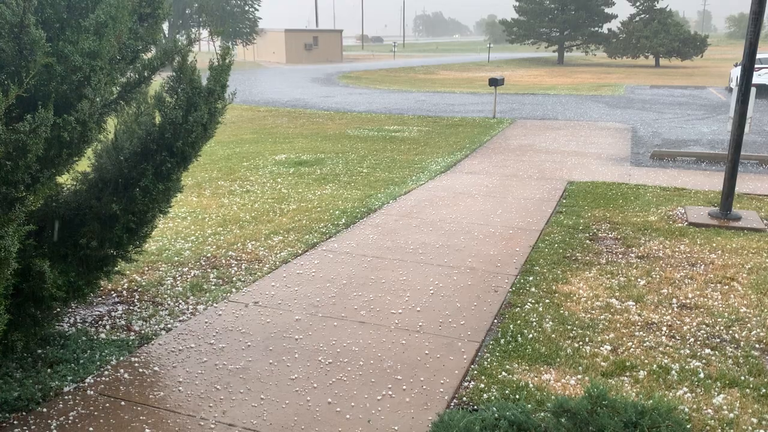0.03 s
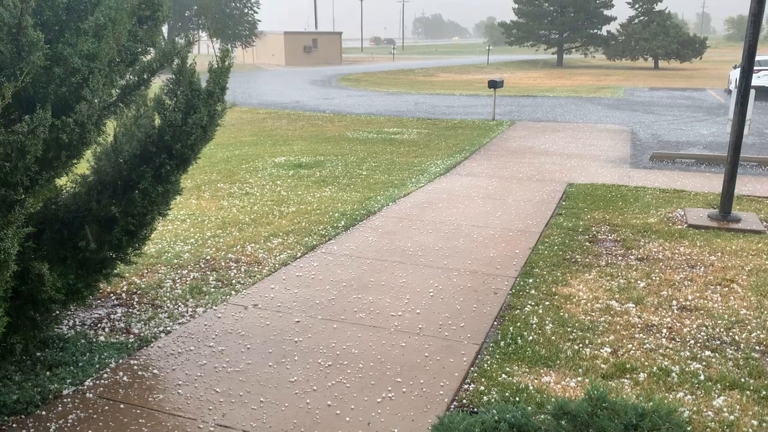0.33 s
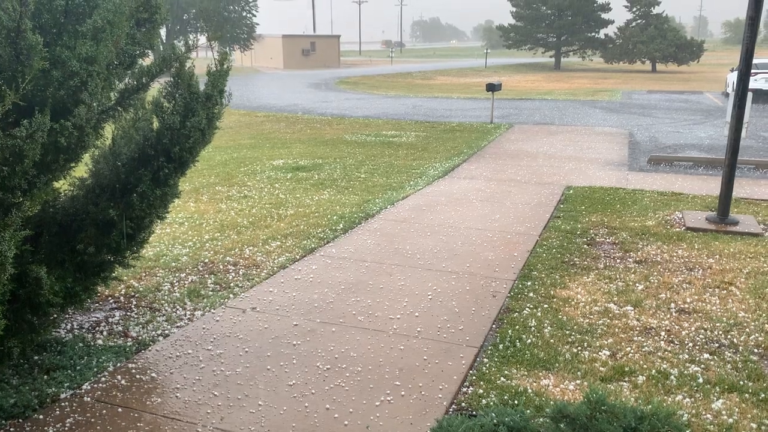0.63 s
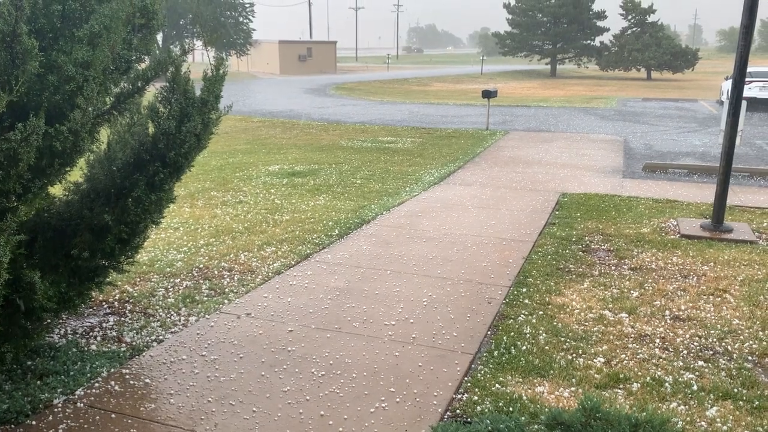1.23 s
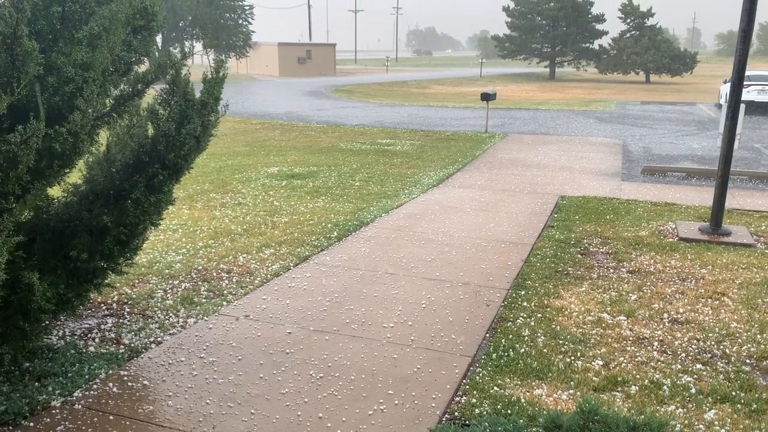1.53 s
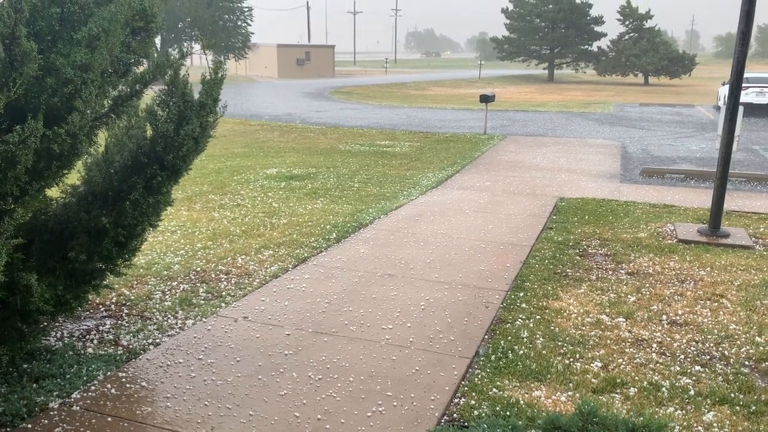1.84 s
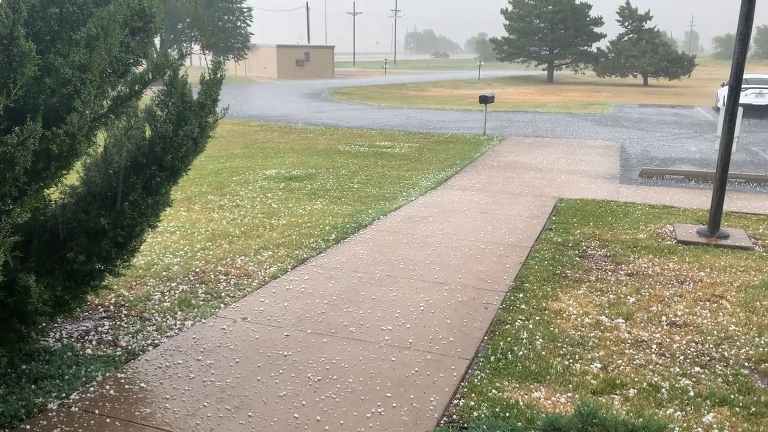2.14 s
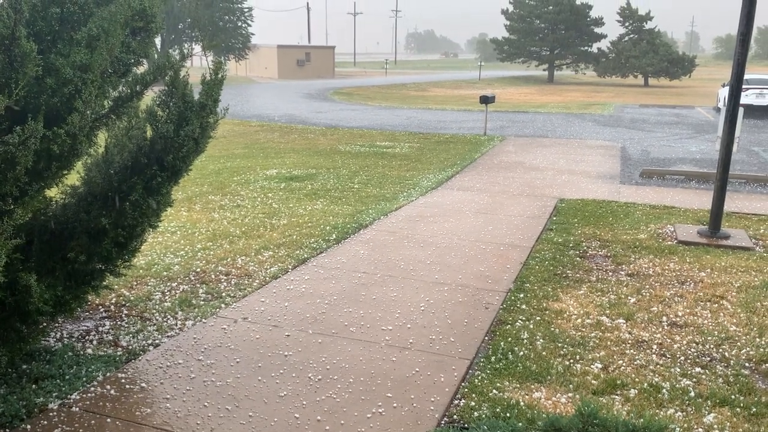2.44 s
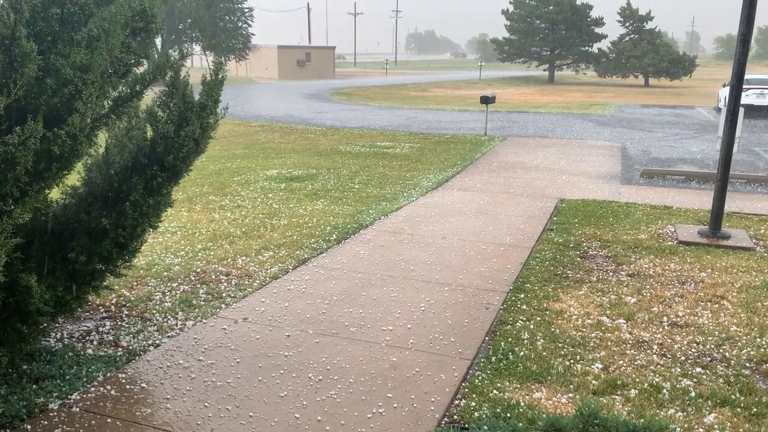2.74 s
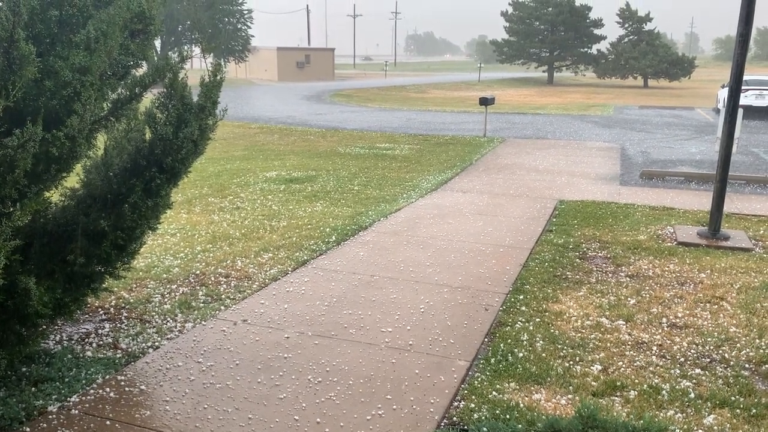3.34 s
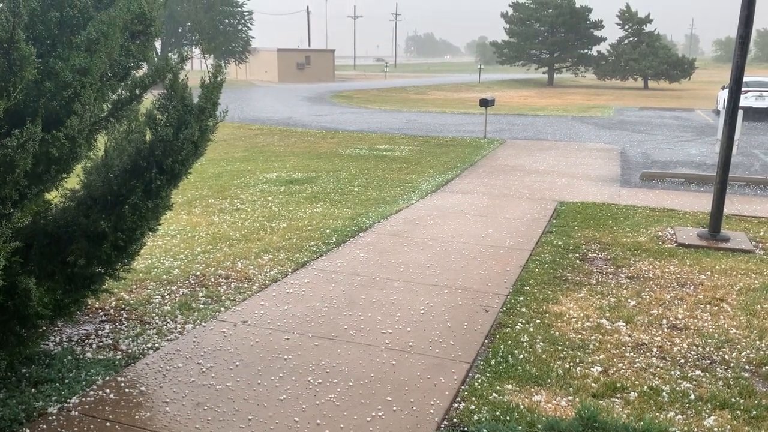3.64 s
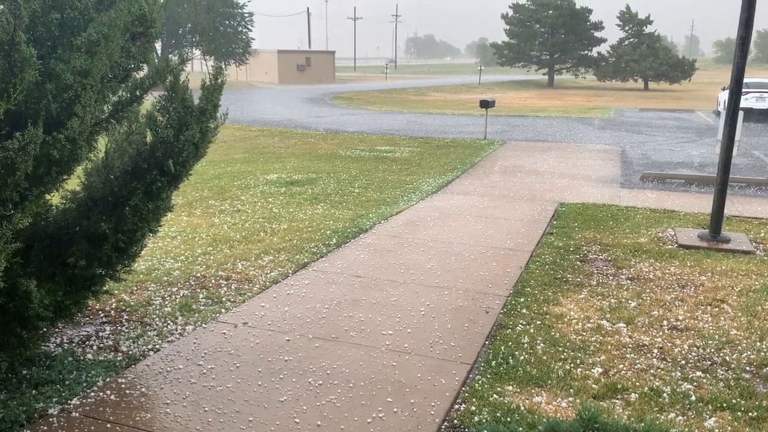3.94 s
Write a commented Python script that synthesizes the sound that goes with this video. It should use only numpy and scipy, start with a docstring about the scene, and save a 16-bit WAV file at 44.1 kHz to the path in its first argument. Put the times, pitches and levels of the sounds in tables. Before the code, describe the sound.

Hail and heavy rain roar throughout the four seconds, with low drumming and rumble beneath nearer patter and splashes. Close hailstones clack and crack irregularly on the concrete by a doorway, echoing briefly off the wall, while others knock on hollow things. Sharper hits come around 0.3 seconds. Stones ping on metal near 0.4 seconds, in a quick bounce at 2.5, and again at 3.5.

```python
"""Hail and heavy rain from a doorway

A stereo pair faces a lawn and a concrete path. Far off, countless impacts merge into a roar over a low
drumming and boom. Nearer stones patter, splash and tap. The closest plock on hollow things, clack,
or crack and scatter on the concrete with an echo off the house wall; a few ping on metal."""
import sys
import numpy as np
from scipy import signal
from scipy.fft import rfft, irfft
from scipy.io import wavfile

SR = 44100
rng = np.random.default_rng(int(sys.argv[2]) if len(sys.argv) > 2 else 0)


def wav_record(signal):
    """Record a signal, one row per channel, as 16-bit PCM in the file named by sys.argv[1]."""
    frames = np.transpose(np.atleast_2d(signal))
    bounded = np.clip(frames, -1, 1)
    # unit amplitude maps onto the largest positive 16-bit level
    quanta = np.round(bounded * 32767).astype(np.int16)
    wavfile.write(sys.argv[1], SR, quanta)


N = 176400
T, HZ = np.arange(N) / SR, np.maximum(np.arange(N // 2 + 1) * SR / N, 1)

# far hail and rain: frequency_hz, level_db_per_hz
ROAR_SPECTRUM = [(15, -92), (25, -70), (43, -69), (59, -64.5), (74, -55.5), (111, -68.5), (130, -59),
                 (165, -61), (200, -59.5), (300, -63), (520, -68), (720, -66), (870, -66), (1030, -66.5),
                 (1300, -63.5), (1650, -66.5), (2300, -66.5), (4100, -70), (5500, -74), (6600, -73.5),
                 (8700, -79.5), (10500, -78.5), (13000, -81), (15800, -121)]
# how alike the roar is left and right: frequency_hz, correlation
ROAR_LIKENESS = [(30, 0), (70, 0.4), (170, 1), (330, .5), (480, 0.05), (700, -0.32), (1000, -0.4),
                 (1350, -0.77), (2000, -0.01), (3000, -0.25), (4200, 0.36), (5500, -0.3)]
# swell of the deep rumble, taken about its mean: time_s, level_db
RUMBLE_CONTOUR = [(0.1, -38), (0.28, -29), (0.31, -41), (0.63, -31.5), (0.66, -43), (0.79, -37.5),
                  (1.3, -41), (1.37, -33.5), (1.53, -40.5), (1.9, -36.5), (1.93, -47.5), (2.18, -37.5),
                  (2.21, -44), (2.38, -35), (2.59, -41.5), (2.62, -34), (2.67, -51), (2.72, -32),
                  (2.76, -39), (3.34, -40), (3.38, -31), (3.51, -39), (3.87, -33.5), (4.0, -35)]
# swell of the low drumming, taken about its mean and scaled down: time_s, unscaled_db
DRUMMING_CONTOUR = [(0.1, -36), (0.91, -33.5), (0.95, -27), (1.08, -36), (1.38, -34), (2.13, -38),
                    (2.18, -26), (2.37, -37), (2.63, -29), (2.71, -37), (2.74, -30), (2.83, -47),
                    (2.93, -29.5), (3.01, -48), (3.09, -30), (3.23, -40), (3.26, -32), (4.0, -34.5)]
# booming tones under the roar: pitch_hz, level_db, width_hz
BOOM_TONES = [(204, -48, 4.5), (354, -52, 1.9)]
# patter on the path: frequency_hz, level_db_per_hz
PATTER_SPECTRUM = [(200, -101.5), (700, -70), (1500, -83), (2400, -73.5), (4200, -70), (6200, -87.5),
                   (8800, -66.5), (11500, -84.5), (15800, -86)]
# fine splashes: frequency_hz, level_db_per_hz
SPLASH_SPECTRUM = [(300, -82), (1200, -74), (3000, -72.5), (6500, -74.5), (9000, -77), (15800, -75.5)]
# tone curve over the small taps: frequency_hz, relative_db
TAP_TONE = [(500, -82), (850, -70), (1050, -76.5), (1300, -69), (1550, -76.5), (2000, -70), (3500, -76),
            (4600, -75), (6200, -88.5)]
# stones on hollow things nearby: start_s, pitch_hz, level_db
PLOCK_HITS = [(0.1189, 1304, -22.5), (.572, 845, -29), (.592, 913, -29.5), (0.661, 1320, -28),
              (0.713, 1330, -33), (1.38, 1340, -29), (1.718, 1450, -42), (1.755, 1330, -37),
              (1.76, 847, -32), (1.952, 850, -35), (2.312, 839, -30.5), (2.524, 884, -27.5),
              (2.542, 876, -29), (2.541, 1350, -48), (3.416, 1270, -25.5), (3.936, 1260, -30),
              (3.95, 986, -28.5)]
# stones on the concrete by the door: start_s, clack_db, crack_db, scatter_t60_s
STONE_HITS = [(0.1394, -26, -18, 0.04), (0.288, -20, -33, 0.078), (0.3672, -37, -17.5, 0.04),
              (0.3847, -22, -39, 0.058), (0.635, -24, -23.5, 0.1), (0.66, -21, -24.5, 0.072),
              (0.849, -28, -37, 0.089), (0.8606, -21.5, -26, 0.2), (0.912, -24, -36, 0.051),
              (0.9514, -24.5, -29, .06), (1.084, -23, -30, 0.1), (1.144, -22.5, -28, 0.089),
              (1.163, -23, -29, 0.13), (1.17, -23, -30.5, 0.29), (1.187, -23, -40, 0.13),
              (1.261, -22.5, -35, 0.069), (1.445, -24, -31, 0.053), (1.475, -25, -36, 0.09),
              (1.4927, -29, -30, .08), (1.56, -27, -28.5, 0.058), (1.586, -25, -30, 0.11),
              (1.68, -23, -24, .04), (1.686, -24.5, -28, 0.055), (1.705, -24, -32, .05),
              (1.846, -23.5, -29, 0.06), (1.932, -38, -25.5, .04), (1.952, -26, -28, 0.15),
              (1.981, -23, -33, .07), (2.03, -30, -33, 0.22), (2.1387, -19, -17, 0.022),
              (2.223, -35, -23.5, .05), (2.428, -30, -25, 0.065), (2.4594, -27, -24, .03),
              (2.4742, -25, -15, 0.028), (2.491, -31, -43, .07), (2.517, -23, -44, 0.12),
              (2.532, -27, -29, 0.25), (2.6065, -18.5, -21, 0.03), (2.617, -21.5, -29, 0.13),
              (2.684, -29, -24, 0.17), (2.7804, -25.5, -28, 0.12), (2.8053, -22.5, -24.5, 0.09),
              (2.949, -38, -24.5, .04), (3.23, -37, -24, 0.037), (3.2892, -25, -26, 0.036),
              (3.3047, -27, -26.5, 0.23), (3.3693, -20, -28, 0.068), (3.384, -23, -23.5, 0.081),
              (3.4184, -23, -29, 0.31), (3.458, -23, -25, 0.052), (3.486, -27, -33, 0.28),
              (3.5463, -22.5, -27, 0.088), (3.5649, -24, -24, .07), (3.631, -29, -25.5, 0.16),
              (3.6437, -24, -30, 0.32), (3.819, -23, -28, 0.043), (3.863, -34, -30, 0.041)]
# stones on something hard: start_s, pitch_hz, width_hz, level_db, t60_s
CLACK_HITS = [(.1398, 3350, 420, -22, 0.095), (.2892, 3470, 2400, -16.5, 0.029),
              (.2955, 3880, 1100, -17, 0.053), (.3674, 11470, 8000, -12, .006),
              (0.914, 3240, 1000, -30, .04), (1.591, 3970, 3000, -27.5, 0.057),
              (1.6795, 4500, 2400, -21, .035), (2.4747, 10300, 7000, -13, 0.0087),
              (2.607, 2640, 1200, -20, 0.0098), (2.868, 3510, 300, -29, .07),
              (3.4585, 6500, 1500, -23, 0.024)]
# stones on metal, bright when direct, dull on a bounce: start_s, low_modes_db, high_modes_db, knock_db
PING_HITS = [(0.3674, -42, -21, -40), (2.4745, -28, -19, -18), (2.4838, -38, -38, -11),
             (2.4915, -23, -36, -16.5), (2.4995, -46, -47, -17), (3.483, -21, -47, -32)]
# modes of the metal: pitch_hz, relative_db, t60_s
METAL_MODES = [(2268, -10.5, 0.5), (2384, -1, 0.35), (2610, -9, 0.5), (4260, -9, .2), (4540, -10, .07),
               (5070, -18, .3), (7230, -0.5, 0.098), (7820, -3, .04), (8900, 5, .04), (10020, 6, 0.03),
               (10100, -7, 0.05), (11700, 2, .04), (13600, -6, .04), (15030, -11, .05)]
# treble that both microphone ports hear: frequency_hz, share
MIC_SHARE = [(5600, 0.067), (6400, 0.51), (7400, 0.6), (8300, 1), (16000, 1)]
# lean of the pair: frequency_hz, left_minus_right_db
MIC_BALANCE = [(40, -2), (200, -4), (400, 0.5), (800, 0.5), (1500, 0), (4000, -0.2), (5500, -3), (7000, -2),
               (8200, 0)]


def from_db(db):
    """Decibels to gain."""
    return 10 ** (np.asarray(db) / 20)


def unit_power(x):
    """Scale to an RMS of one."""
    return x / np.sqrt(np.mean(x ** 2) + 1e-20)


def at_hz(points):
    """Read a table along log frequency."""
    hz, value = np.transpose(points)
    return np.interp(np.log(HZ), np.log(hz), value)


def swell(contour):
    """Read a level contour along time, in dB about its mean."""
    db = np.interp(T, *np.transpose(contour))
    return db - db.mean()


def colour(x, spectrum):
    """Shape a signal by a curve; a white one comes out at the curve's dB per Hz."""
    return irfft(rfft(unit_power(x)) * from_db(at_hz(spectrum)) * np.sqrt(SR / 2), N)


def band(x, edges_hz):
    """Band-pass that keeps the power of white noise."""
    low, high = edges_hz
    sos = signal.butter(2, edges_hz, "band", fs=SR, output="sos")
    return signal.sosfilt(sos, x + 1e-18) * np.sqrt(SR / 2 / (high - low))


def drift(rate_hz):
    """A smooth random wander with a spread of one."""
    step, settle = 40, 2000
    pole = np.exp(-2 * np.pi * rate_hz * step / SR)
    noise = rng.standard_normal(N // step + settle + 2)
    slow = signal.lfilter([1], [1, -2 * pole, pole * pole], noise)[settle:]
    return np.interp(np.arange(N) / step, np.arange(len(slow)), unit_power(slow))


def decay(t60_s):
    """The first third of a second of an exponential decay."""
    return np.exp(-np.log(1000) * T[:SR // 3] / t60_s)


def add(out, start_s, sound):
    """Mix a sound in at a time."""
    i = int(start_s * SR)
    out[:, i:i + sound.shape[-1]] += sound[..., :N - i]


def scatter(envelope):
    """Dense reflections under an envelope, different on each side."""
    return rng.standard_normal((2, len(envelope))) * envelope


def ring(hz, t60_s):
    """A dying sine that reaches each side in a phase of its own."""
    fade = decay(t60_s)
    cycles = hz * T[:len(fade)] + rng.random()
    side_offset = [[0], [rng.uniform(-.3, .3)]]
    return fade * np.sin(2 * np.pi * (cycles + side_offset))


def roar(rumble_top_hz=105, drumming_top_hz=420):
    """Far impacts merge to noise: rumble and drumming swell, each half octave above the rumble flickers."""
    alike = np.clip(at_hz(ROAR_LIKENESS), -.99, .99)
    mid, side = rfft(colour(rng.standard_normal((2, N)), ROAR_SPECTRUM))
    pair = np.sqrt(1 + alike) * mid + np.sqrt(1 - alike) * side * [[1], [-1]]
    rumble_db, drumming_db = swell(RUMBLE_CONTOUR), .41 * swell(DRUMMING_CONTOUR)
    surge_db = .5 * drift(rate_hz=1.8)
    edges_hz = np.r_[0, 50 * 2 ** (np.arange(18) / 2)]
    out = 0
    for low, high in zip(edges_hz, edges_hz[1:]):
        if high < rumble_top_hz:
            db = rumble_db
        else:
            flicker_db = 1.73 * drift(rate_hz=14)
            db = flicker_db + (drumming_db if high < drumming_top_hz else surge_db)
        out += from_db(db) * irfft(pair * ((HZ >= low) & (HZ < high)), N)
    return out


def boom(drone_hz=59, drone_db=-42.5, wander_rad=.76):
    """A deep drone swells with the rumble, under low tones that waver in strength and phase."""
    phase = 2 * np.pi * drone_hz * T + wander_rad * drift(rate_hz=3.4)
    out = from_db(drone_db + swell(RUMBLE_CONTOUR)) * np.sqrt(2) * np.sin(phase)
    for hz, db, width_hz in BOOM_TONES:
        waver = drift(width_hz) + 1j * drift(width_hz)
        out += from_db(db) * np.real(waver * np.exp(2j * np.pi * hz * T))
    return out


def shower(spectrum, hits_per_s, spread_db, scatter_db, t60_s, patchy_db, patches=10):
    """Random impacts on patches of nearer ground, each with its own direction, tone and reflections."""
    out = 0
    for across in np.linspace(-1, 1, patches):
        sizes = from_db(spread_db * np.minimum(rng.exponential(1, N), 3)) * rng.choice([-1, 1], N)
        clicks = sizes * (rng.random(N) < hits_per_s / patches / SR)
        response = scatter(decay(t60_s))
        response *= from_db(scatter_db) / np.sqrt(np.sum(response ** 2) / 2)
        for side, way in enumerate((across, -across)):
            response[side, int(12 + 11 * way)] += 1  # direct sound reaches the nearer side first
        tone = np.c_[np.geomspace(300, 16000, 12), rng.normal(0, patchy_db, 12)]
        out += rfft(clicks) * rfft(response, N) * from_db(at_hz(tone))
    return colour(irfft(out, N), spectrum)


def taps(low_hz=650, high_hz=6200, t60_at_1khz_s=.1, spread_db=13, count=800):
    """Many faint strikes at random, each ringing at its own pitch; higher ones die sooner."""
    out = np.zeros((2, N))
    for when, pitch, size in rng.random((count, 3)):
        hz = low_hz * (high_hz / low_hz) ** pitch
        khz = hz / 1000
        gain = from_db(spread_db * size) * khz ** .75
        add(out, when * T[-1], gain * ring(hz, t60_at_1khz_s / np.sqrt(khz)))
    band_share = 2 * (high_hz - low_hz) / SR
    return colour(out, TAP_TONE) * np.sqrt(band_share)


def plocks(t60_s=.11, thud_db=-1):
    """Stones strike hollow things nearby: a short ring with a dull thud."""
    rings, thuds = np.zeros((2, 2, N))
    for start_s, hz, db in PLOCK_HITS:
        add(rings, start_s, from_db(db) * ring(hz, t60_s))
        add(thuds, start_s, from_db(db + thud_db) * scatter(decay(t60_s)))
    return rings + band(thuds, edges_hz=(570, 1940))


def close_stones(ring_hz=(2430, 5980), ring_db=-10, click_db=18, max_lag_s=.00022):
    """Each stone clicks and rings briefly; its clack and bright crack scatter and echo off the wall."""
    direct, bodies, cracks = np.zeros((3, 2, N))
    wall_echo = from_db(-12) * decay(t60_s=.37)
    first_contact = from_db(2) * decay(t60_s=.0029)
    for start_s, clack_db, crack_db, t60_s in STONE_HITS:
        tail = np.hypot(decay(t60_s), wall_echo)
        add(bodies, start_s, from_db(clack_db) * scatter(tail))
        add(cracks, start_s, from_db(crack_db) * scatter(np.hypot(tail, first_contact)))
        across, pitch = rng.random(2)
        stone_ring = ring(np.interp(pitch, (0, 1), ring_hz), t60_s=.022)
        add(direct, start_s, from_db(clack_db + ring_db) * stone_ring)
        for side, way in zip(np.eye(2), (across, 1 - across)):
            add(direct, start_s + max_lag_s * way, from_db(crack_db + click_db) * side[:, None])
    return direct + band(bodies, edges_hz=(1980, 5000)) + band(cracks, edges_hz=(5830, 12200))


def clacks(modes=6):
    """Hard hits ring briefly in a cluster of unevenly spaced resonances."""
    out = np.zeros((2, N))
    for start_s, hz, width_hz, db, t60_s in CLACK_HITS:
        offsets = (np.arange(modes) + rng.random(modes)) / modes - .5
        cluster = sum(ring(hz + width_hz * offset, t60_s) for offset in offsets)
        add(out, start_s, from_db(db) * np.sqrt(2 / modes) * cluster)
    return out


def pings(high_modes_above_hz=3500):
    """A stone knocks on a piece of metal and sets its modes ringing."""
    out = np.zeros((2, N))
    for start_s, low_db, high_db, knock_db in PING_HITS:
        add(out, start_s, from_db(knock_db) * ring(hz=2490, t60_s=.02))
        for hz, mode_db, t60_s in METAL_MODES:
            strike_db = high_db if hz > high_modes_above_hz else low_db
            add(out, start_s, from_db(mode_db + strike_db) * ring(hz, t60_s))
    return out


def scene():
    """What reaches the doorway: nearer patter, splashes and taps, the far roar and the close hits."""
    patter = shower(PATTER_SPECTRUM, hits_per_s=260, spread_db=6, scatter_db=8,
                    t60_s=.089, patchy_db=4.5)
    splashes = shower(SPLASH_SPECTRUM, hits_per_s=1400, spread_db=1.7, scatter_db=-2.5,
                      t60_s=.0077, patchy_db=2)
    near = patter + splashes + taps()
    far = roar() + boom()
    close = close_stones() + clacks() + plocks() + pings()
    return far + near + close


def record(dry, in_phase_hz=6264, phase_turn_hz=4670, ceiling=1.3, start_s=.083, cutoff_hz=15850):
    """The microphone pair shares its treble and leans a little right; peaks are rounded, the top is cut."""
    left, right = rfft(dry)
    share = np.clip(at_hz(MIC_SHARE), 0, .998)
    phase_turn = np.exp(2j * np.pi * (HZ - in_phase_hz) / phase_turn_hz)
    right = np.sqrt(1 - share ** 2) * right + share * left * phase_turn
    lean = from_db(at_hz(MIC_BALANCE) / 2 * [[1], [-1]])
    pair = irfft(np.array([left, right]) * lean, N)
    pair = ceiling * np.tanh(pair / ceiling)
    pair *= T >= start_s  # opens on a moment of silence
    low_pass = 1 / np.sqrt(1 + (HZ / cutoff_hz) ** 240)
    return irfft(rfft(pair) * low_pass, N)


dry = scene()
out = record(dry)
wav_record(out)
```